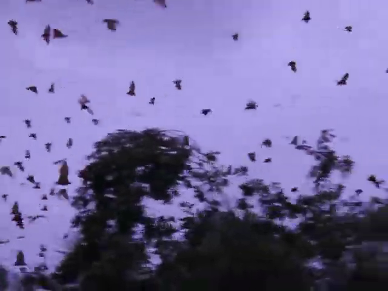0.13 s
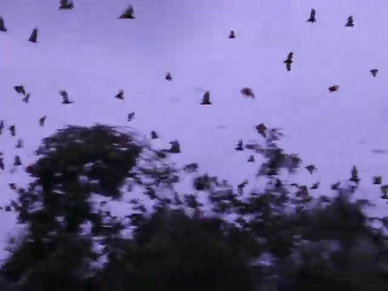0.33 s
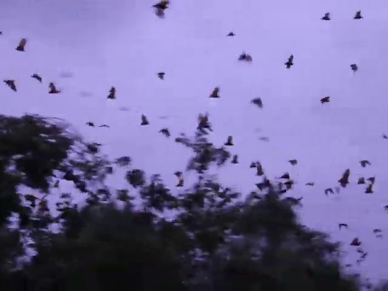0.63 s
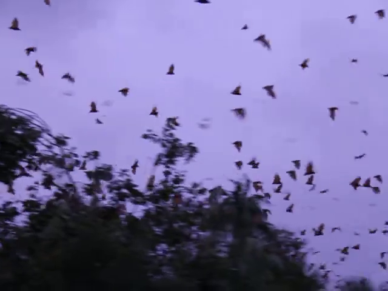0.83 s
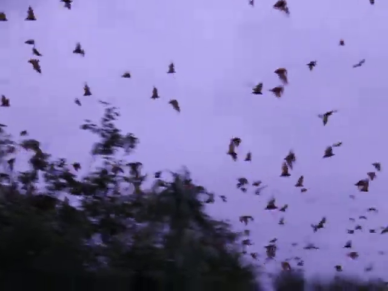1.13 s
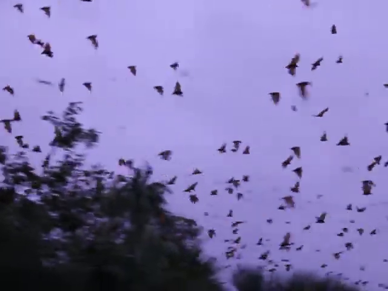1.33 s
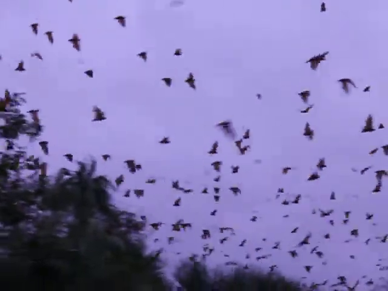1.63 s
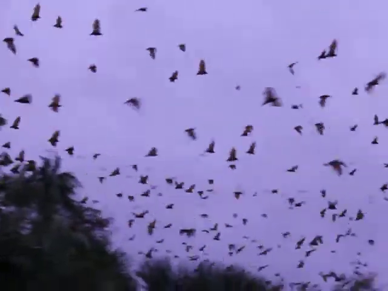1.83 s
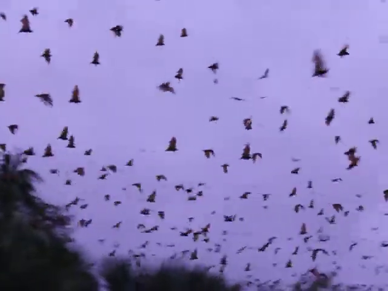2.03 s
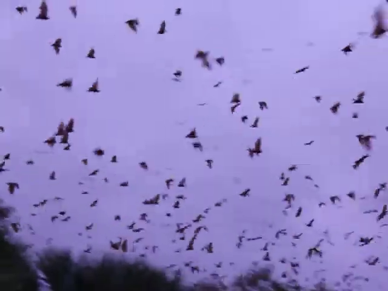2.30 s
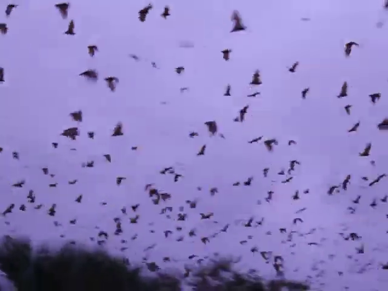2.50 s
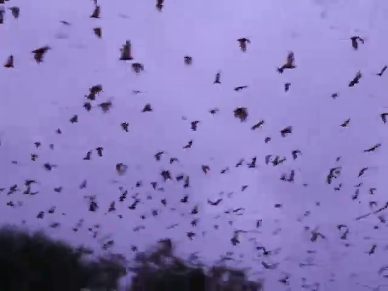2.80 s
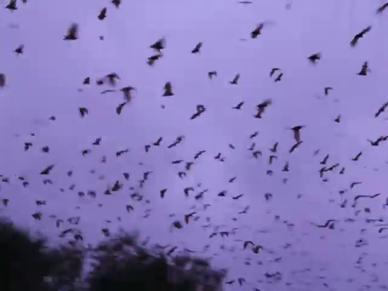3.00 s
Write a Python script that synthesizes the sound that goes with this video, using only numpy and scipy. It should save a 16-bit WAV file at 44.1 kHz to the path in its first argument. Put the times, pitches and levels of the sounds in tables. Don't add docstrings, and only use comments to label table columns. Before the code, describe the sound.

Fruit bat colony chattering and squeaking continuously at dusk, one harsh close screech near the start

```python
import sys
import numpy as np
from scipy import signal
from scipy.io import wavfile
from scipy.ndimage import uniform_filter1d

SR = 44100
rng = np.random.default_rng(int(sys.argv[2]) if len(sys.argv) > 2 else 0)


def inscribe(sig):
    pcm = np.round(np.clip(np.atleast_2d(sig).T, -1, 1) * 32767)
    wavfile.write(sys.argv[1], SR, pcm.astype(np.int16))


def to_linear_factor(level_db):
    exponent = np.asarray(level_db, float) / 20
    return 10 ** exponent


N = 138915
ATTACK_S, RELEASE_S = .006, .006
SQUEAL_WOBBLE_HZ, SQUEAL_ROUGH = 45, (.1, .12)
RASP_WIDTH_HZ = 400


def rms_one(x):
    return x / np.sqrt(np.mean(np.abs(x) ** 2) + 1e-20)


def at_hz(spectrum, hz):
    points = np.array(spectrum)
    return np.interp(np.log(hz), np.log(points[:, 0]), points[:, 1])


def lowpass(x, hz):
    r = np.exp(-2 * np.pi * hz / SR)
    return signal.lfilter([(1 - r) ** 2], [1, -2 * r, r * r], x)


def band(x, low, high, order=2):
    return signal.sosfilt(signal.butter(order, [low, high], "band", fs=SR, output="sos"), x)


def drift(rate, count):
    r = np.exp(-32 * np.pi * rate / SR)
    white = rng.standard_normal((count, N // 16 + 3001))
    slow = rms_one(signal.lfilter([1], [1, -2 * r, r * r], white)[:, 3000:])
    return np.repeat(slow, 16, axis=1)[:, :N]


def voice(hz, wobble_hz, rough, multiple=1):
    rough = np.clip(rough, 0, 1)
    white = [1, 1j] @ rng.standard_normal((2, len(hz) + 4000))
    low = signal.butter(2, wobble_hz, fs=SR, output="sos")
    flutter = rms_one(signal.sosfilt(low, white))[-len(hz):]
    carrier = np.exp(2j * np.pi * multiple * np.cumsum(hz) / SR)
    return np.sqrt(2) * np.real((np.sqrt(1 - rough) + np.sqrt(rough) * flutter) * carrier)


def shape(t, length, attack):
    return np.clip(t / attack, 0, 1) * np.exp(-np.clip(t - length, 0, None) / RELEASE_S)


def tracked(rows, wobble_hz, rough, partials=()):
    s, pitch, db = np.transpose(rows)
    t = np.arange(N) / SR
    hz = np.interp(t, s, pitch)
    tone = voice(hz, wobble_hz, np.interp(t, s[[0, -1]], rough))
    for thirds, partial_db, flutter_hz in partials:
        tone = tone + to_linear_factor(partial_db) * voice(hz, flutter_hz, 0.99, multiple=np.round(thirds) / 3)
    return tone * to_linear_factor(np.interp(t, s, db)) * shape(t - s[0], s[-1] - s[0], ATTACK_S)


def calls(rows, wobble_hz, rough, attack):
    t = np.arange(SR // 3) / SR
    out = np.zeros(N + 2 * SR)
    for s, length, first, last, db in rows:
        i = int((1 + s) * SR)
        hz = np.interp(t, [0, length], [first, last])
        out[i:i + len(t)] += to_linear_factor(db) * shape(t, length, attack) * voice(hz, wobble_hz, rough)
    return out[SR:SR + N]


def coloured(spectrum, patchy_db, together_db):
    lowest, highest = spectrum[0][0], spectrum[-1][0]
    edges = lowest * .8 * 2 ** np.arange(0, np.log2(highest / lowest) + .5, 1 / 3)
    white = rng.standard_normal((2, N))
    own, shared = drift(9, count=40), drift(8, count=1)[0]
    out = np.zeros(N)
    for k, (low, high) in enumerate(zip(edges, edges[1:])):
        db = at_hz(spectrum, np.sqrt(low * high)) + patchy_db * own[k] + together_db * shared
        out += to_linear_factor(db) * band(white[k % 2], low, min(high, .45 * SR))
    return rms_one(out)


# time in seconds, pitch in Hz, level in dB.
SCREECH = [(.107, 2180, -27), (.12, 2290, -21), (.147, 2500, -21.5), (.17, 2570, -26), (.215, 2680, -21),
           (.255, 2880, -21), (.285, 2780, -23), (.308, 2700, -19.5), (.322, 2600, -23)]
# multiple in thirds of the pitch, level in dB, flutter in Hz.
SCREECH_PARTIALS = [
    (3, -4.5, 420),
    (4, -8, 550),
    (5, -9, 600),
]


def screech():
    return to_linear_factor(4.5) * tracked(SCREECH, wobble_hz=110, rough=(.2, .7), partials=SCREECH_PARTIALS)


# start in seconds, length in seconds, first and last pitch in Hz,
# level in dB.
OVERTONES = [(.1, .09, 7800, 8000, -38.5), (.19, .09, 8500, 8950, -42.5), (.1, .22, 6600, 6900, -42),
             (.12, .14, 11000, 11200, -51), (.288, .035, 8250, 8300, -35.5), (.28, .07, 11000, 10100, -50),
             (.17, .1, 13300, 13300, -53)]


def screech_overtones():
    return calls(OVERTONES, RASP_WIDTH_HZ, 1, ATTACK_S)


# time in seconds, pitch in Hz, level in dB.
SQUEAL = [(2.378, 2110, -33), (2.44, 2115, -30), (2.475, 2210, -33), (2.526, 2300, -26), (2.534, 2310, -40),
          (2.545, 2320, -38), (2.556, 2340, -19), (2.594, 2345, -25), (2.612, 2340, -37)]


def squeal():
    return tracked(SQUEAL, SQUEAL_WOBBLE_HZ, SQUEAL_ROUGH)


# time in seconds, pitch in Hz, level in dB.
SWOOP = [
    (1.865, 3500, -38),
    (1.885, 3660, -35),
    (1.945, 3430, -33),
    (1.967, 3589, -36),
    (1.99, 3680, -32),
]


def swoop():
    return tracked(SWOOP, SQUEAL_WOBBLE_HZ, SQUEAL_ROUGH)


# start in seconds, length in seconds, first and last pitch in Hz, level in dB.
SQUEAKS = [(.077, 0.013, 3680, 3680, -24), (.095, .03, 3720, 3700, -29.5), (.03, .025, 4150, 4100, -27.5),
           (.095, .025, 4330, 4330, -29), (.005, .025, 2580, 2560, -30.5), (.02, 0.041, 2200, 2150, -35.5),
           (.115, 0.23, 1730, 2120, -37.5), (.205, 0.022, 4620, 4600, -20.5), (.35, 0.084, 2500, 2500, -39),
           (1.085, .02, 1510, 1496, -35), (1.175, 0.078, 2653, 2610, -32), (1.37, 0.076, 2380, 2248, -35),
           (1.5, 0.054, 3270, 3280, -29.5), (1.725, 0.045, 5500, 5150, -39), (2.1, .04, 2750, 2760, -35),
           (1.92, .08, 3050, 3000, -35.5), (1.74, 0.014, 2370, 2350, -28), (1.81, .03, 5700, 4600, -40),
           (1.36, .05, 2950, 2400, -34), (2.01, 0.0385, 3040, 3200, -32.5),
           (2.03, 0.014, 2600, 2600, -31.5), (2.2, 0.075, 3087, 3010, -33), (2.42, 0.045, 2920, 2770, -33),
           (2.48, 0.064, 2800, 2930, -31.5), (2.335, 0.053, 3620, 3780, -38.5), (2.9, .15, 3170, 3170, -40),
           (2.64, 0.11, 2340, 2330, -36), (2.83, 0.02, 3200, 3170, -32), (2.885, .03, 2950, 2900, -32),
           (2.925, .1, 2470, 2500, -34), (1.23, 0.047, 2600, 2900, -36)]
# start in seconds, length in seconds, first and last pitch in Hz, level in dB.
PEEPS = [(2.58, 0.037, 9500, 8900, -49.5), (2.585, .04, 12600, 12000, -56), (2.635, 0.013, 9600, 9500, -52),
         (2.845, .012, 8800, 8700, -47), (2.895, .015, 8400, 8200, -47), (1.96, .04, 14700, 14500, -57),
         (2.215, .07, 12700, 12700, -58)]


def squeaks():
    return calls(SQUEAKS + PEEPS, wobble_hz=60, rough=.3, attack=ATTACK_S)


# start in seconds, length in seconds, first and last pitch in Hz, level in dB.
RASPS = [(-.05, 0.14, 4100, 3930, -30), (0.07, 0.083, 3880, 4320, -29.5), (0.155, 0.1, 4950, 4150, -23),
         (0.18, 0.13, 3850, 3800, -24), (.27, 0.049, 4500, 4750, -25), (0.65, 0.23, 4190, 4200, -32),
         (1.4, 0.17, 4530, 4670, -37.5), (2.2, .17, 2700, 3020, -42), (2, 0.17, 3200, 3100, -44),
         (2.72, .15, 3120, 3600, -41), (2.92, 0.1, 3450, 3700, -28.5), (2.91, .11, 4300, 4700, -33),
         (2.93, .11, 2900, 2800, -34)]


def rasps():
    return calls(RASPS, RASP_WIDTH_HZ, 1, attack=.035)


# start in seconds, length in seconds, first and last pitch
# in Hz, level in dB.
CROAKS = [(-.03, .12, 2590, 2500, -38), (.02, .11, 3740, 3650, -30.5), (.22, .06, 4040, 3900, -32),
          (.53, 0.092, 2680, 2740, -37), (.65, 0.084, 2760, 2616, -29), (.81, .24, 3900, 3800, -30),
          (1.35, 0.096, 2400, 2250, -35), (1.52, 0.093, 4080, 3910, -31), (1.62, 0.045, 3300, 3490, -32.5),
          (1.72, 0.088, 2820, 2910, -35.5), (2.39, 0.21, 1394, 1353, -46), (2.85, .12, 1450, 1405, -44),
          (2.22, 0.145, 4700, 4820, -38), (2.5, 0.031, 5210, 5200, -46), (.238, 0.032, 3250, 3050, -22),
          (1.2, .1, 3310, 3010, -32.5), (3.06, .09, 3040, 2894, -37)]


def croaks():
    return calls(CROAKS, wobble_hz=200, rough=1, attack=ATTACK_S)


def uneven_throat(harsh):
    pulses_per_s = 300 * (1 + 0.2004 * drift(40.3, count=1)[0])
    chop = 1 + .25 * np.sin(2 * np.pi * np.cumsum(pulses_per_s) / SR)
    return chop * harsh


def trees(x):
    out = x.copy()
    for delay_s, db in zip((.017, .031, .052, .083), (-15, -18, -22, -26)):
        out += to_linear_factor(db) * np.pad(x, (int(delay_s * SR), 0))[:N]
    return out


# frequency in Hz, level in dB per Hz.
CHATTER = [(760, -41), (1300, -9), (1950, -12.5), (2310, -2), (3430, -2), (4600, -6.5), (4980, -4),
           (6150, -23.5), (9000, -23), (11700, -55), (19800, -120)]


def chatter():
    throats_db, blur_db = -31.5, -30
    calls_per_s, swing_db, glide = 6.6, 3.2, .07
    pitch = np.geomspace(1700, 7000, 30)[:, None] * np.exp(glide * drift(4, count=30))
    swing = swing_db * np.clip(drift(calls_per_s, count=30), -3, 1.8)
    effort = to_linear_factor(swing + at_hz(CHATTER, pitch)) * np.sqrt(pitch)
    throats = sum(gain * voice(hz, 117, 0.52) for hz, gain in zip(pitch, effort))
    blur = coloured(CHATTER, patchy_db=2.0, together_db=0.64)
    return to_linear_factor(throats_db) * rms_one(throats) + to_linear_factor(blur_db) * blur


# start in seconds, length in seconds, level in dB.
WINGBEATS = [(.0, .05, -54), (.2, .16, -49), (1.0, .05, -54), (1.198, .02, -54), (1.4, .22, -51),
             (1.955, .06, -52), (2.215, .03, -55), (2.26, .05, -52), (2.89, .03, -53), (2.93, 0.074, -52)]


def wings():
    low_hz, top_hz = 6000, 14000
    snap_s, snap_db = 2.952, -36
    t = np.arange(N) / SR
    sweep = np.zeros(N)
    for s, length, db in WINGBEATS:
        sweep += to_linear_factor(db) * np.exp(-(2 * (t - s - length / 2) / length) ** 2)
    snap = to_linear_factor(snap_db) * (t > snap_s) * np.exp(-np.abs(t - snap_s) / .0015)
    high = signal.butter(2, low_hz, "high", fs=SR, output="sos")
    white = rng.standard_normal(N)
    rustle = rms_one(signal.sosfilt(high, lowpass(white, top_hz)))
    crack = rms_one(signal.sosfilt(high, lowpass(white, 5000)))
    return sweep * rustle + snap * crack


# time in seconds, level in dB.
BUMPS = [(0.056, -30), (0.084, -31.5), (0.113, -31), (0.306, -32.5), (0.948, -36), (1.03, -43),
         (1.348, -41), (1.42, -56), (1.661, -43), (3.001, -48)]


def wind():
    bump_s, bump_hz = 0.0047, 102
    t = np.arange(N) / SR
    push = np.zeros(N)
    for s, db in BUMPS:
        push += to_linear_factor(db + 2) * np.exp(-((t - s) / bump_s) ** 2) * np.sin(2 * np.pi * bump_hz * (t - s))
    gusts = to_linear_factor(4.8 * drift(9.3, count=1)[0])
    rumble = rms_one(band(rng.standard_normal(N), 45, 246))
    return push + to_linear_factor(-56.5) * gusts * rumble


# frequency in Hz, level in dB per Hz.
AIR = [(25, -28), (60, -6.5), (120, -0.5), (300, -1), (900, -6), (2000, -10), (6000, -19.5), (16000, -23.5)]


def air():
    return to_linear_factor(-38.5) * coloured(AIR, patchy_db=0.2, together_db=0.86)


# time in seconds, low and high edge in Hz, level in dB.
UNLIKE = [(.82, 11700, 13200, -62), (1.33, 4600, 6300, -42), (1.33, 14500, 16000, -66),
          (1.495, 7500, 9000, -54), (1.495, 11000, 13200, -61), (1.588, 10300, 11800, -60),
          (2.355, 6300, 9000, -53), (2.355, 11000, 13200, -61)]


def unlike_hiss():
    t = np.arange(N) / SR
    side = np.zeros(N)
    for s, low, high, db in UNLIKE:
        burst = np.clip(3 - np.abs(t - s) / .006, 0, 1)
        side += to_linear_factor(db) * burst * rms_one(band(rng.standard_normal(N), low, high, order=6))
    return side * [[1], [-1]]


def scene():
    clear = screech() + squeal() + swoop() + squeaks()
    harsh = uneven_throat(rasps() + screech_overtones() + croaks())
    far = chatter() + wings() + wind() + air()
    mono = trees(clear + harsh) + far
    return np.array([mono, mono])


def band_limit(x):
    return signal.sosfilt(signal.butter(12, 16050, fs=SR, output="sos"), x)


def record(dry):
    duck_from_db, duck_share = -24.5, 0.68
    attack_s, recover_db_per_s = .09, 15.5
    level = 10 * np.log10(uniform_filter1d(dry[0] ** 2, size=1500) + 1e-12)
    excess = np.clip(level - duck_from_db, 0, None) * duck_share
    ramp = recover_db_per_s * np.arange(N) / SR
    held = np.maximum.accumulate(excess + ramp) - ramp
    ducked = dry * to_linear_factor(-lowpass(held, 1 / (np.pi * attack_s)))
    top_cut = signal.cheby2(20, 60, 15950, fs=SR, output="sos")
    mix = signal.sosfilt(top_cut, ducked + unlike_hiss())
    return band_limit(mix)


dry = scene()
out = record(dry)
inscribe(out)
```